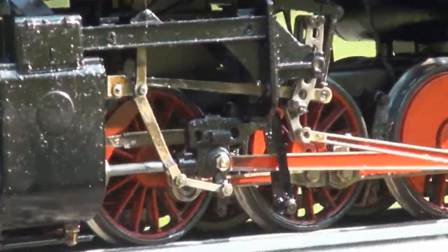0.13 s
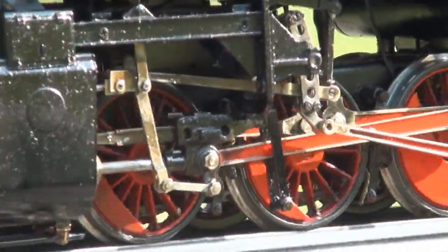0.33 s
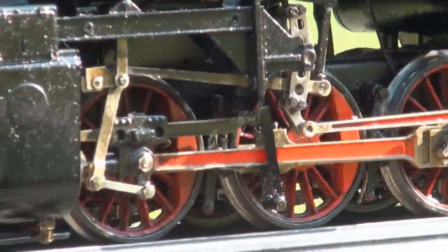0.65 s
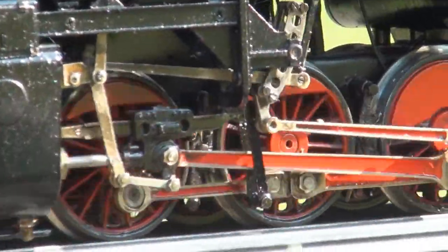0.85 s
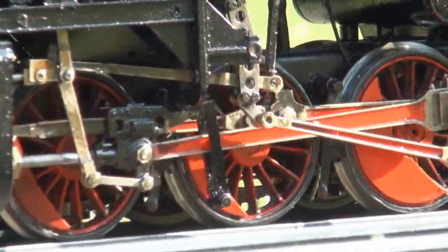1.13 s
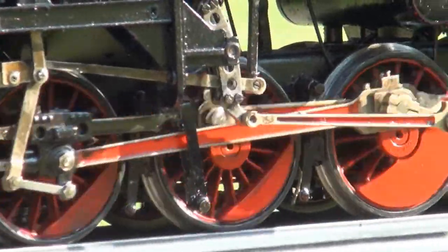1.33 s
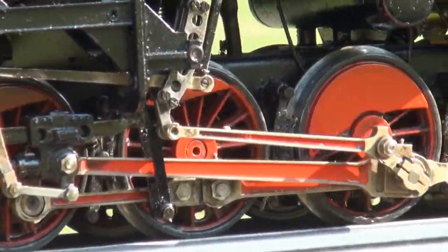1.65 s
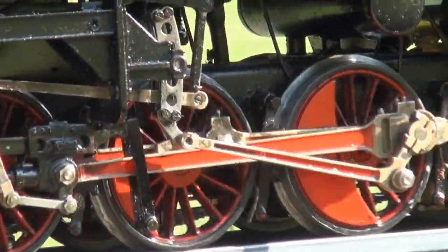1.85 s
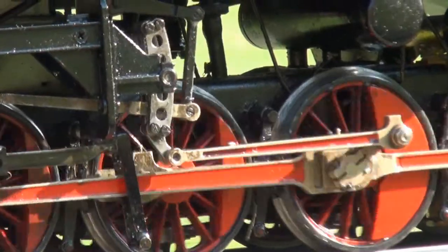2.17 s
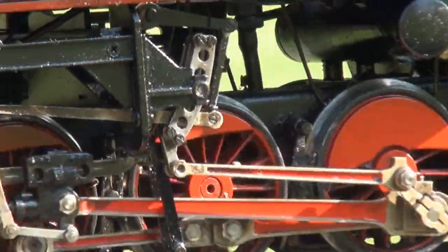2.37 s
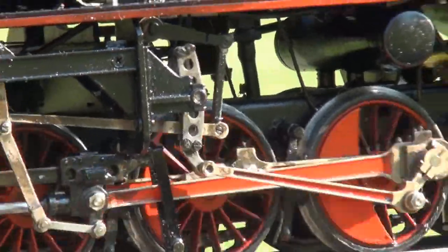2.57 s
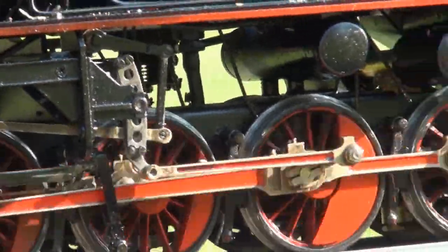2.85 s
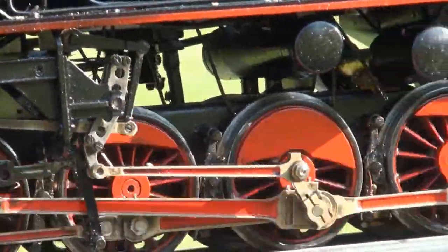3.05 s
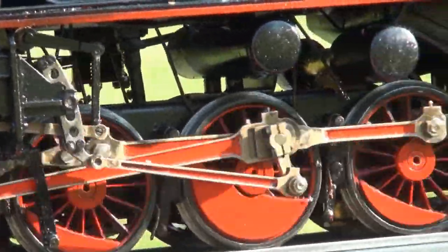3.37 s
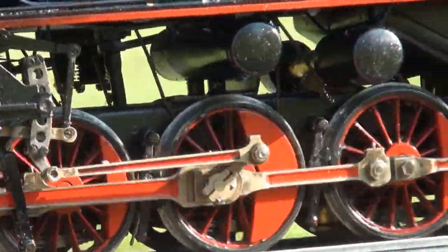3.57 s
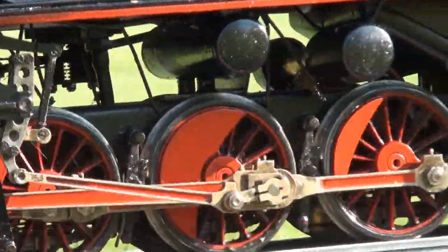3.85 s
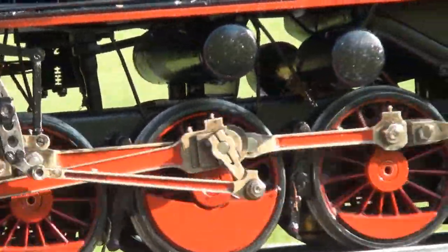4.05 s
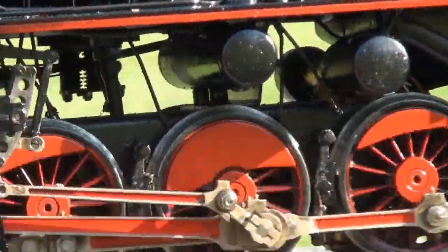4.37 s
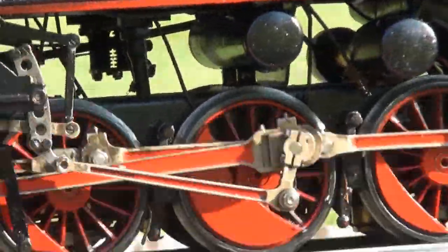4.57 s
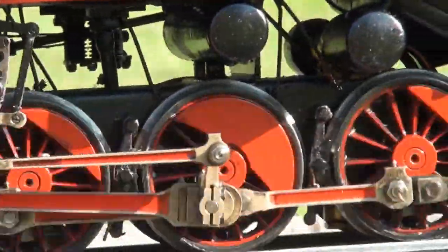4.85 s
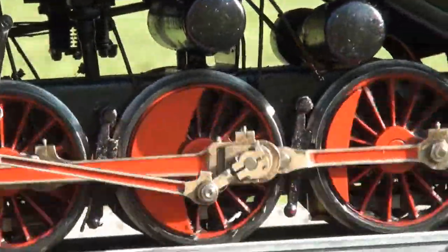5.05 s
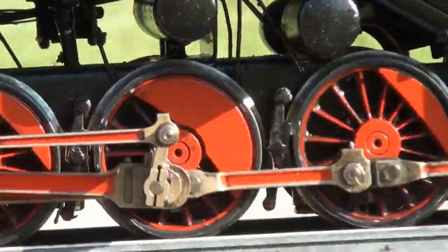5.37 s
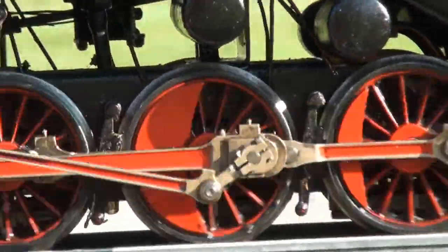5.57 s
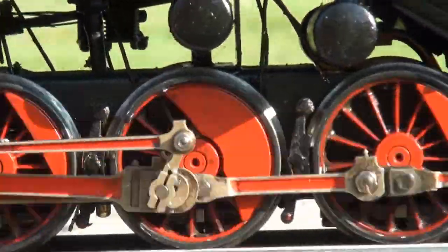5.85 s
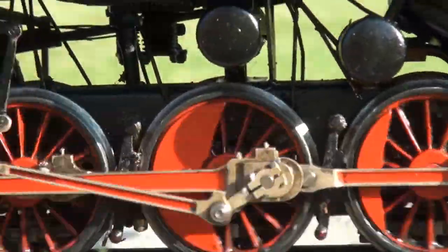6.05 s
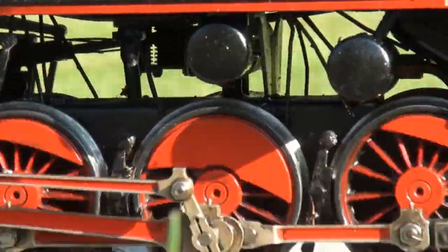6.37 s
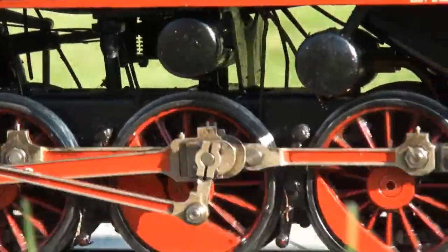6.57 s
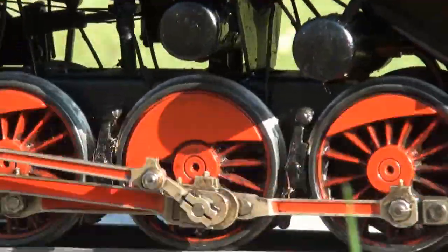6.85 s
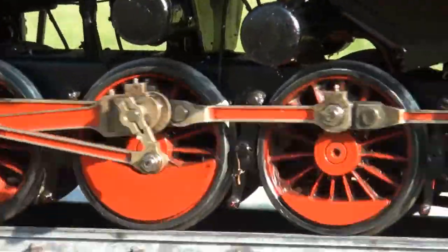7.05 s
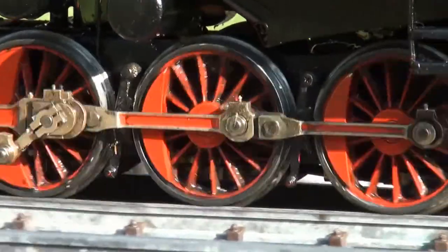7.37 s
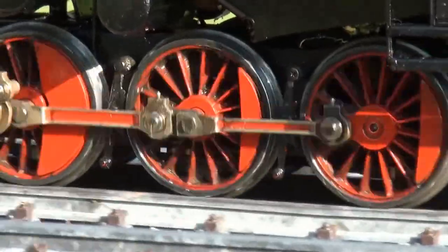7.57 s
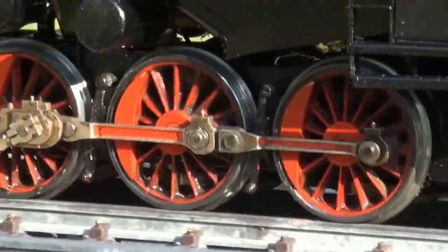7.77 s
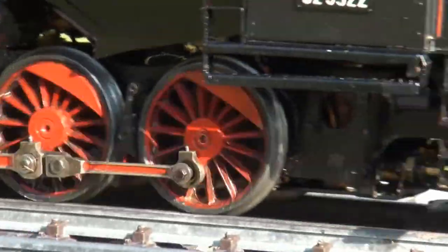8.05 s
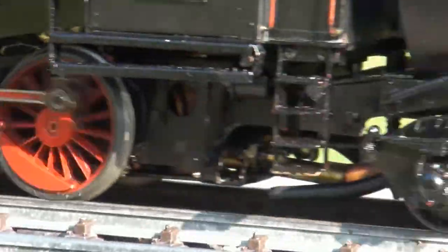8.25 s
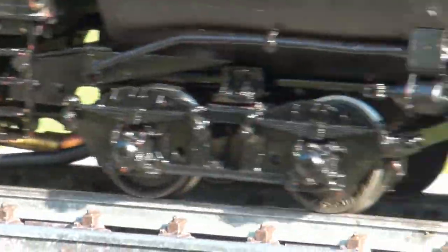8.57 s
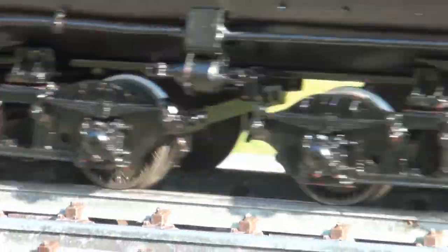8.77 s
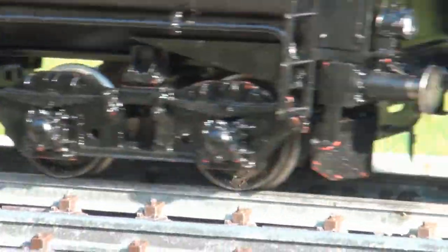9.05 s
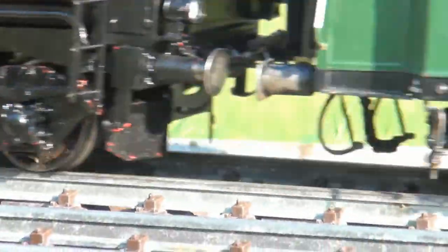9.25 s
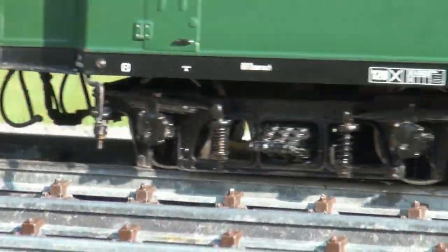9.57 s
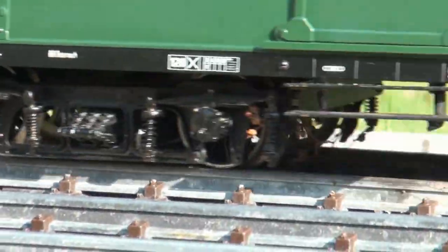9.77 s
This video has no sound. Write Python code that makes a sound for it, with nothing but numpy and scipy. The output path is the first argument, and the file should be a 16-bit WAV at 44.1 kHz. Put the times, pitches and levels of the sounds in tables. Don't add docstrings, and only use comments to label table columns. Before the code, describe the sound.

Fast, slightly uneven chuffs from a small live steam engine, heard near the track in an open garden with barely any echo. The beats grow stronger and crowd together until they are a rapid chatter of steam. A soft continuous hiss and a low wash of wheels fill the gaps. The tone shifts as the engine passes, then dulls slightly at the end, with muffled wind thuds on the microphone.

```python
import sys
import numpy as np
from scipy import signal
from scipy.io import wavfile
from scipy.ndimage import uniform_filter1d

SR = 44100
rng = np.random.default_rng(int(sys.argv[2]) if len(sys.argv) > 2 else 0)


def attenuation_scalar(level_db):
    decades = np.asarray(level_db, float) / 20
    return 10 ** decades


def wav_out(sig):
    wavfile.write(sys.argv[1], SR, np.round(np.clip(np.atleast_2d(sig).T, -1, 1) * 32767).astype(np.int16))


N = 437472
T = np.arange(N) / SR

# (time [s], whistle pitch [Hz], whistle raggedness [0-1],
# jet body above fizz [dB], upper chimney modes [dB])
PASSING = [
    (0.0, 5460, 0.35, 6, 4),
    (1.99, 5140, 0.94, 6, 4.5),
    (3.51, 4938, 0.3, 6.5, 6),
    (4.56, 5630, 0.2, 3.5, 6.5),
    (6.44, 5340, 0.05, 2.5, 4),
    (8.4, 5670, 0.6, 1.5, 3.5),
    (9.92, 5330, 0.4, 2, -1.5),
]
# (time [s], level [dB], treble above 11 kHz [dB],
# top above 13 kHz lost by all steam [dB])
BLOW_BY = [
    (0, -38, 0, -1),
    (2.5, -37, -2, 0),
    (5, -35.5, -4, 0),
    (7.5, -34.5, -4, -1),
    (8.5, -37, -4, -6),
    (9.92, -40.5, -2, -9),
]


def evened(x):
    return x / np.sqrt(np.mean(x ** 2) + 1e-20)


def read(points, hz):
    f, value = np.transpose(points)
    return np.interp(np.log(hz + 1), np.log(f + 1), value)


def curve(rows, order):
    columns = np.transpose(rows)
    return np.interp(T, columns[0], columns[order])


def flutter(size):
    once = uniform_filter1d(rng.standard_normal(N), size)
    return evened(uniform_filter1d(once, size))


def resonate(x, hz, width):
    turn = np.exp(2j * np.pi * np.cumsum(hz * np.ones(N)) / SR)
    r = np.exp(-np.pi * width / SR)
    return 2 * (turn * signal.lfilter([1 - r], [1, -r], x / turn)).real


def noise(level_db, size, likeness=None):
    # (frequency [Hz], likeness [0-1])
    port_likeness = [(60, 0.7), (200, 1), (380, 0.99), (790, 0.95), (1650, 1), (3400, 0.91), (7000, 0.84),
                     (13000, 0.96)]
    # (frequency [Hz], left minus right [dB])
    port_lean = [(60, 0.5), (130, -1.5), (290, 0.5), (640, 0.0), (1410, -0.5), (3100, 0), (6820, -1.5),
                 (15000, 3)]
    hop = size // 4
    hz = np.fft.rfftfreq(size, 1 / SR)[:, None]
    at = np.minimum(np.arange(N // hop + 2) * hop, N - 1)
    a, b, c, d = rng.standard_normal((len(at), len(hz), 4)).T
    same = np.clip(read(port_likeness, hz) if likeness is None else likeness, 0, 1)
    mid = np.sqrt(1 + same) * (a + 1j * b)
    side = np.sqrt(1 - same) * (c + 1j * d)
    lean = attenuation_scalar(read(port_lean, hz) / 2)
    z = np.array([(mid + side) * lean, (mid - side) / lean]) * attenuation_scalar(level_db(hz, at))
    return signal.istft(z, nperseg=size, noverlap=size - hop)[1][:, :N] / np.sqrt(size / 1.5)


def beats():
    # (first valve opens [s], mid-turn drag [s])
    wheel_turns = [(0.075, .001), (0.911, .001), (1.688, .001), (2.43, -.003), (3.139, -.002), (3.808, 0),
                   (4.424, -.001), (4.991, .001), (5.514, 0), (6.004, .003), (6.463, .004), (6.903, 0),
                   (7.328, -.002), (7.742, .001), (8.146, 0), (8.532, -.001), (8.915, 0), (9.298, -.002),
                   (9.675, -.001), (10.053, 0)]
    # (share of the turn [0-1], valve delay [s])
    valves = [
        (0, 0),
        (.2662, -.0019),
        (.4786, -.0039),
        (.7002, .0045),
    ]
    # (fizz [dB], whistle [dB], chimney [dB], emptying factor, sigh [dB])
    ends = [
        (-.5, 0, 0, 1.09, -1.5),
        (0.43, -0.1, 0.55, 1.02, -3),
        (0.1, 0.8, 0, 0.87, 2),
        (-0.13, 0.5, 0.45, 0.94, 1),
    ]
    # (time [s], fizz [dB], nozzle whistle above fizz [dB], chimney above fizz [dB])
    effort = np.transpose([(0, -31.5, 6.5, 4), (.7, -30.5, 3, 1.5), (1.2, -29.5, 2, 4.5),
                           (1.6, -31, -2, 2.5), (1.95, -29, 2.5, 4), (2.7, -29.5, -5, 1.5),
                           (3.4, -29, 2, 2.5), (4.3, -29.5, -5, 4), (4.8, -28, 1.5, 5.5),
                           (5.2, -28.5, 0.5, 3.5), (5.7, -27.5, 3, 3), (6.1, -27.5, 7, 5),
                           (6.9, -26.2, 4, 5.5), (7.4, -27.5, 3, 6.5), (8.2, -26.5, 2.5, 5),
                           (8.7, -27.5, -2, 5), (9.3, -28.5, -0.5, 5.5), (9.92, -30, 4.5, 6)])
    # (time [s], sigh relative to blast [dB])
    sighs = np.transpose([
        (0, -14.5),
        (1.2, -16.5),
        (2.8, -15),
        (4.4, -15),
        (5.6, -13),
        (6.7, -14),
        (8, -13),
        (9, -12),
        (9.92, -12),
    ])
    starts, drags = np.transpose(wheel_turns)
    rows = []
    for start, period, drag_s in zip(starts, np.diff(starts), drags):
        for (share, delay_s), (fizz_db, note_db, pipe_db, factor, sigh_db) in zip(valves, ends):
            s = start + share * period + delay_s + drag_s * (share > 0)
            fizz, note, pipe = (np.interp(s, effort[0], v) for v in effort[1:])
            empty_s = factor * (0.104 * period + 0.003)
            sigh = np.interp(s, *sighs) + sigh_db
            rows.append((s, fizz + fizz_db, note + note_db, pipe + pipe_db, empty_s, sigh))
    return np.array(rows)


def steam(rise_s, lag_s, shape=2.29, shut_s=0.015, shut_db=-8, sag_db=-4):
    events = beats()
    opens = events[:, 0] + lag_s
    beat = np.searchsorted(opens, T) - 1
    since = np.where(beat < 0, T + 0.14, T - opens[beat])
    left = np.append(opens, opens[-1] + 0.095)[beat + 1] - T
    rows = events[np.maximum(beat, 0)].T
    empty_s, sigh_db = rows[4], rows[5]
    opening_s = rise_s * (empty_s / 0.06) ** 0.23
    blast = (1 - np.exp(-(since / opening_s) ** 2)) * attenuation_scalar(-12 * (since / empty_s) ** shape)
    pinch_db = shut_db * np.exp(-left / shut_s) + sag_db * (since / (since + left) - 0.75)
    sigh = attenuation_scalar(2 * (sigh_db + pinch_db)) * np.clip(0.088 + since / rise_s, 0, 1)
    return 10 * np.log10(blast + sigh), rows


def jet():
    # (frequency [Hz], level [dB per Hz])
    ahead = [(650, -14), (1100, -12.5), (1310, -23.5), (1440, -12.5), (1570, -20), (2340, -16), (4350, -7),
             (5260, 5), (5620, -1.5), (6280, -8.5), (6640, -10.5), (10300, 1), (11100, -3.5), (15600, -31)]
    abeam = [(650, -7), (1100, -21.5), (1420, -8), (1730, -11.5), (2790, -6.5), (3900, -5), (4400, -9.5),
             (4970, -1.5), (5500, 4.5), (6570, -4), (7580, -3), (9260, 0.5), (11100, -2.5), (15600, -31)]
    behind = [(650, -32), (1100, -43), (1190, -10), (1420, -17), (1790, -35), (2070, -12.5), (2470, -17),
              (3020, -12.5), (4260, -11.5), (5560, 5.5), (7020, -10.5), (10800, 2.5), (12500, -11.5),
              (15600, -34)]
    view_s = [3, 5.2, 10.9]
    # (frequency [Hz], slope [dB per dB])
    follow = [(1200, 1.48), (3000, 0.77), (5500, 1.2), (7500, 1.43), (10000, 2), (14000, 2)]
    pressure_db, rows = steam(0.0084, 0)
    shared_db = rows[1] + 1.0 * flutter(size=120)
    body_db, top_db = curve(PASSING, order=3), curve(BLOW_BY, order=3)

    def level_db(hz, at):
        views = np.array([read(v, hz) for v in (ahead, abeam, behind)])
        weights = np.array([np.interp(T[at], view_s, row) for row in np.eye(3)])
        colour = np.einsum("vf,vt->ft", views[..., 0], weights)
        fizz_power = attenuation_scalar(2 * colour) * (hz > 7000) * (hz < 13000)
        fizz_db = 10 * np.log10(fizz_power.mean(0))
        opens = beats()[:, 0]
        beat = np.searchsorted(opens, T[at])
        tint = evened(uniform_filter1d(rng.standard_normal((len(opens), len(hz))), size=6))
        eddies = uniform_filter1d(rng.standard_normal(colour.T.shape), size=12, axis=0)
        eddies = uniform_filter1d(eddies, size=5)
        chance_db = 0.65 * tint[beat].T + 1.0 * evened(eddies).T
        driven_db = read(follow, hz) * pressure_db[at] + shared_db[at]
        driven_db = driven_db + (hz < 4600) * body_db[at] + (hz > 13400) * top_db[at]
        return colour - fizz_db + driven_db + chance_db
    return noise(level_db, size=256) * attenuation_scalar(7.0)


def whistle():
    pressure_db, rows = steam(0.0047, 0.001)
    hiss = noise(lambda hz, at: 0 * hz, size=256)
    hz = curve(PASSING, order=1)
    ragged = np.clip(curve(PASSING, order=2), 0, 1)
    narrow, wide = (evened(resonate(resonate(hiss, hz, w), hz, w)) for w in (400, 1100))
    note = (1 - ragged) * narrow + ragged * wide
    waver_db = 3.7 * np.clip(flutter(size=300), -3, 1.5)
    return note * attenuation_scalar(rows[1] + rows[2] + 1.0 * pressure_db + 0.5 + waver_db)


def chimney():
    # (frequency [Hz], width [Hz], level [dB])
    modes = [(209, 254, -5), (331, 350, 7), (573.6, 462, 3), (744, 355, -0.5), (950, 89, -11),
             (1200, 170, -14)]
    pressure_db, rows = steam(0.021, 0.0016, 2.13)
    drive = noise(lambda hz, at: 0 * hz, size=256)
    upper_db = curve(PASSING, order=4)
    pipe = 0
    for hz, width, mode_db in modes:
        ring = evened(resonate(resonate(drive, hz, width), hz, width))
        pipe = pipe + attenuation_scalar(mode_db + (hz > 450) * upper_db) * ring
    pipe = signal.sosfilt(signal.butter(3, 140, "high", fs=SR, output="sos"), pipe)
    blast_db = rows[1] + rows[3] + 1.304 * pressure_db + 2.0
    return evened(pipe) * attenuation_scalar(blast_db + 0.79 * flutter(size=400))


def garden(x, t60=0.36):
    taps = np.zeros((2, 12000))
    at = np.arange(200, 11980, 20) + rng.integers(0, 20, (2, 589))
    np.put_along_axis(taps, at, rng.choice([-1., 1.], at.shape), 1)
    taps *= attenuation_scalar(-60 * T[:12000] / t60)
    return signal.oaconvolve(x.mean(0)[None], taps / np.linalg.norm(taps[0]), axes=1)[:, :N]


def pinch():
    opens = np.append(beats()[:, 0], 2 * T[-1])
    left = opens[np.searchsorted(opens, T)] - T
    return np.exp(-left / 0.012)


def leak():
    # (frequency [Hz], level [dB per Hz])
    hiss_colour = [(1200, -23), (2200, -12), (4000, -9.5), (5400, -8), (6800, -13), (8000, -4.5),
                   (9200, -12.5), (11000, -10.5), (12800, -22), (14200, -26), (15700, -34)]
    treble_db, top_db = curve(BLOW_BY, order=2), curve(BLOW_BY, order=3)

    def level_db(hz, at):
        return read(hiss_colour, hz) + (hz > 11000) * treble_db[at] + (hz > 13400) * top_db[at]
    hiss = evened(noise(level_db, size=512))
    return hiss * attenuation_scalar(curve(BLOW_BY, order=1) - 8 * pinch() + 1.0 * flutter(size=3000))


def wheels():
    # (time [s], level [dB], rumble under 170 Hz [dB])
    rolling = [
        (0, -33, -3.5),
        (1.7, -32.5, 2),
        (3.3, -32, -4),
        (5, -32, -2),
        (5.6, -27.5, -5.5),
        (6.8, -30, 0),
        (8, -31, 1),
        (9, -33.5, 8),
        (9.92, -33, 6.5),
    ]
    # (frequency [Hz], level [dB])
    wash_colour = [(41, -38), (70, -26), (108, -1), (390, 4.5), (609, -0.5), (801, -5), (1650, -17),
                   (2200, -11.5), (2860, -13), (4840, -120)]
    rumble_db = curve(rolling, order=2)
    wash = noise(lambda hz, at: read(wash_colour, hz) + (hz < 170) * rumble_db[at], size=2048)
    return evened(wash) * attenuation_scalar(curve(rolling, order=1) - 4.5 - 4 * pinch() + 2.4 * flutter(size=1500))


def wind():
    # (frequency [Hz], level [dB])
    bump_colour = [(8, -5), (25, -9), (50, -11.5), (80, -21), (130, -29), (300, -65)]
    # (peak time [s], peak level [dB], rise [s], fall [s])
    gust_events = [(.19, -42, .05, 0.12), (.5, -46, 0.046, .04), (.99, -35, 0.081, 0.059),
                   (1.749, -35.5, 0.23, .15), (2.02, -45, .04, .03), (2.29, -45, .04, 0.036),
                   (2.98, -35, 0.049, 0.088), (3.15, -31, 0.068, 0.044), (3.98, -35, 0.14, 0.09),
                   (4.3, -40, 0.13, .2), (5.25, -48, 0.044, 0.043), (6.48, -41, .12, 0.11),
                   (7.18, -30, 0.11, 0.069), (7.5, -36, 0.17, .4), (8.12, -37, .06, .1),
                   (8.65, -45, .04, 0.071), (8.95, -37, 0.092, 0.11), (9.2, -27.5, 0.059, 0.092),
                   (9.5, -38, .1, .2)]
    calm_db, lumps_db = -45, 2.5
    bumps = noise(lambda hz, at: read(bump_colour, hz), size=4096, likeness=0.89)
    bumps = bumps / np.sqrt(abs(uniform_filter1d((bumps ** 2).mean(0), size=3500)) + 1e-9)
    gusts = 0
    for s, peak_db, rise, fall in gust_events:
        gusts = gusts + attenuation_scalar(peak_db) * np.exp(-((T - s) / np.where(T < s, rise, fall)) ** 2)
    return evened(bumps) * (attenuation_scalar(calm_db) + gusts) * attenuation_scalar(lumps_db * flutter(size=1500))


def scene():
    exhaust = jet() + whistle() + chimney()
    return exhaust + attenuation_scalar(-22.5) * garden(exhaust) + leak() + wheels() + wind()


def top_cut(x):
    return signal.sosfilt(signal.butter(12, 15800, fs=SR, output="sos"), x)


def record(dry):
    soft = 0.95 * np.tanh(dry / 0.95)
    lowpass = signal.firwin(511, 15750, window=("kaiser", 9), fs=SR)
    limited = signal.oaconvolve(soft, lowpass[None], "same")
    return top_cut(limited)


dry = scene()
out = record(dry)
wav_out(out)
```